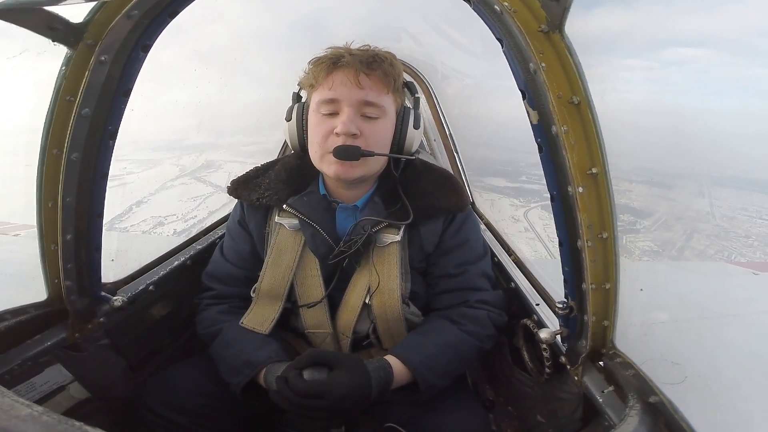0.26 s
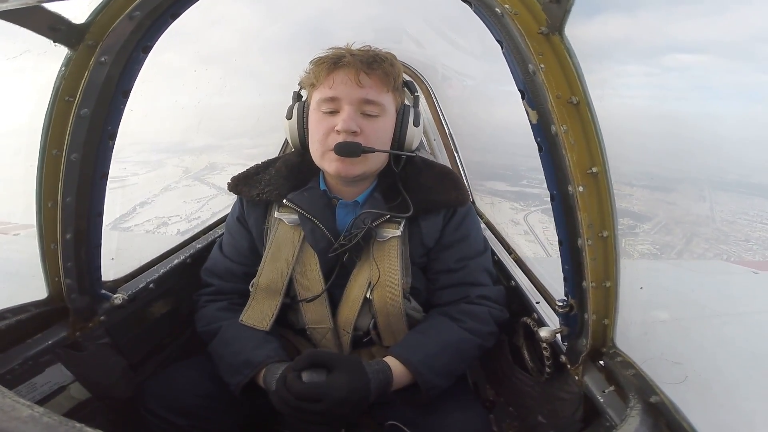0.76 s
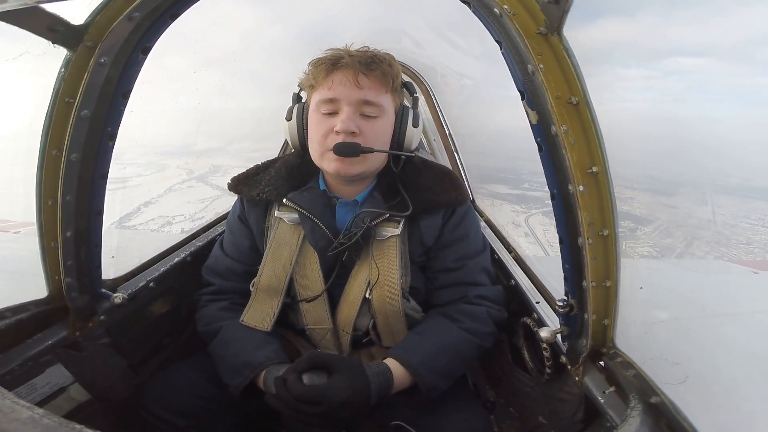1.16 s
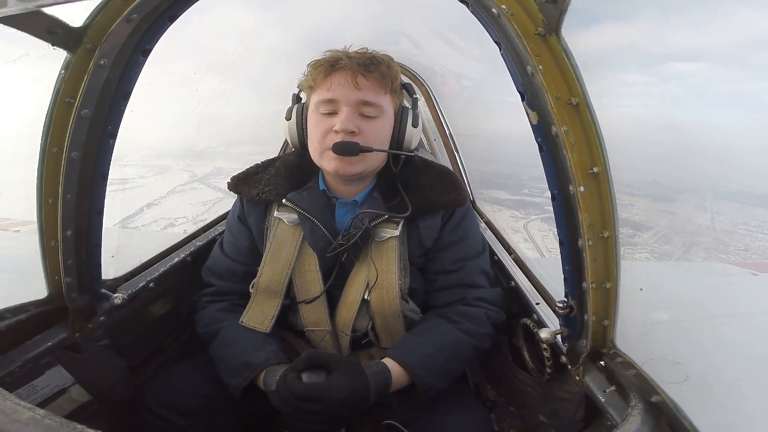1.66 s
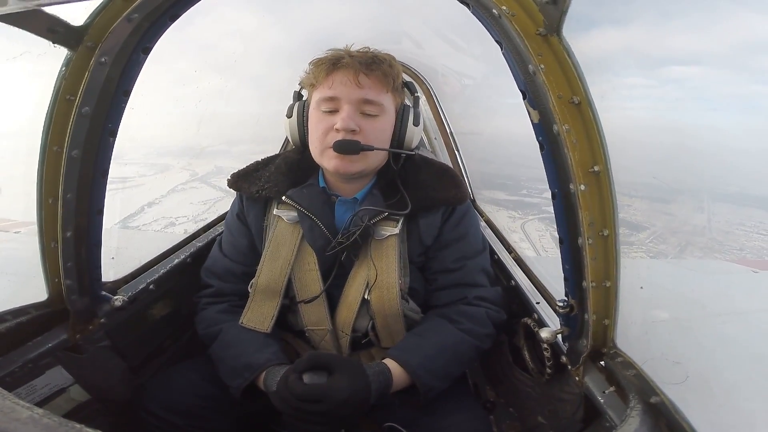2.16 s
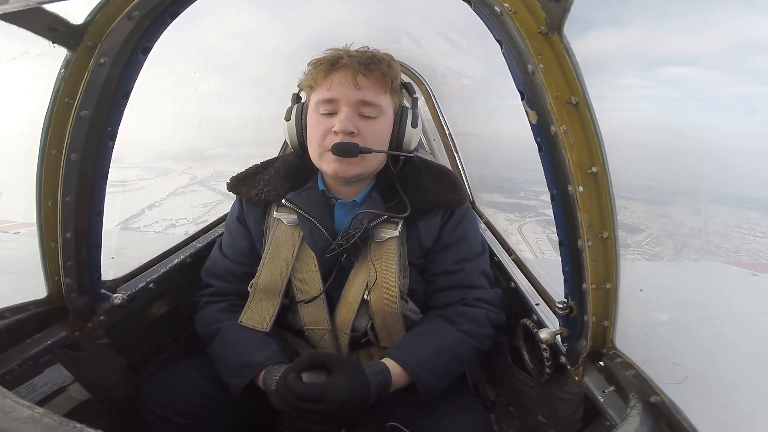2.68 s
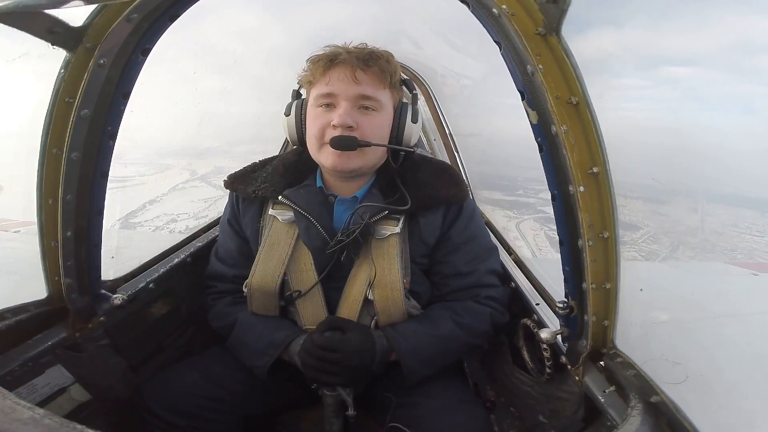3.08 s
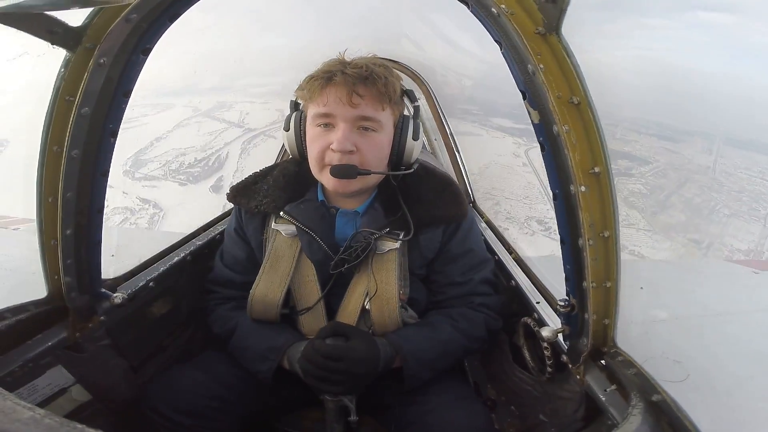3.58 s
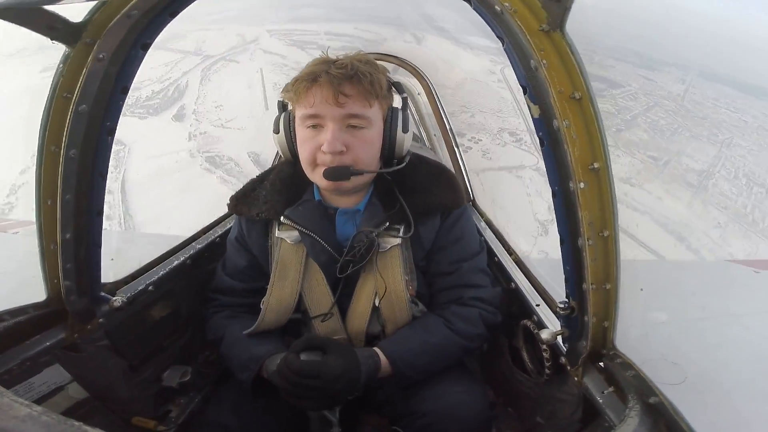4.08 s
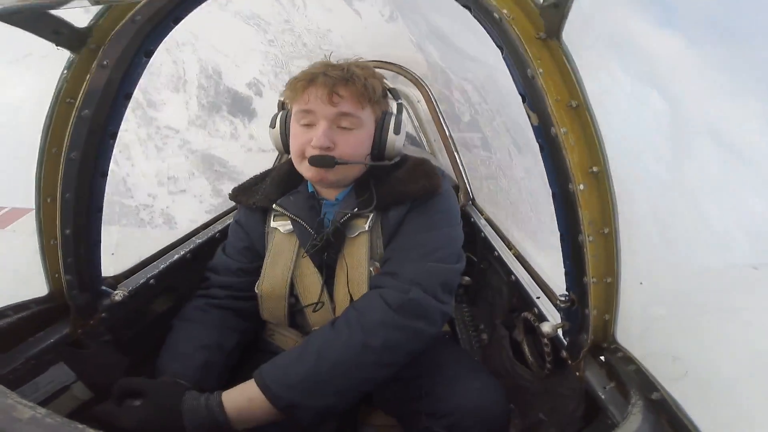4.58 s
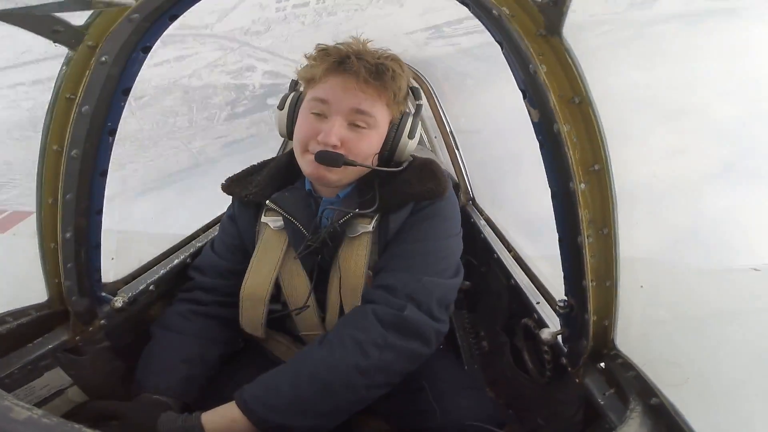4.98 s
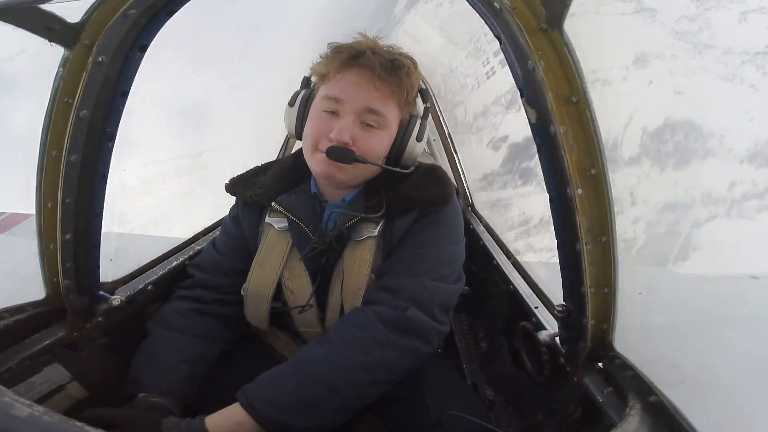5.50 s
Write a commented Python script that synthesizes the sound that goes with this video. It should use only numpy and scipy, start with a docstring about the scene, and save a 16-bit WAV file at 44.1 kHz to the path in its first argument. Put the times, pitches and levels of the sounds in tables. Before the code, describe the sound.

A close cockpit microphone with a bad plug picks up a throbbing piston engine, propeller beats and broad wind noise, heavily lopsided to the right. It runs steadily for over two seconds, drops at a click, recovers and swells with buffeting air. After four seconds loud pops, thumps and scratches chop the drone down to a faint uneven remnant, ending in rapid crackle on both channels.

```python
"""In the cockpit of a light aircraft a geared radial engine drones over propeller beat, rumble and rushing air.
Engine and propeller are sums of wavering tones; air, rumble and hiss are noise shaped in pitch and loudness.
The microphone feeds the right channel through a loose plug; the left gets a dull leak and hiss.
Plug contacts jump as voltage steps, mostly opposite in the two channels, crowd late on and at times bridge both.
Near many of these pops the level drops at once, then mostly climbs back."""
import sys
import numpy as np
from scipy import signal
from scipy.fft import rfft, irfft
from scipy.io import wavfile
from scipy.ndimage import uniform_filter1d

SR = 44100
rng = np.random.default_rng(int(sys.argv[2]) if len(sys.argv) > 2 else 0)


def generate_wav(sig):
    """Save sig (samples, or channels by samples) to the path in sys.argv[1] as 16-bit PCM at SR."""
    pcm = np.round(np.clip(np.atleast_2d(sig).T, -1, 1) * 32767).astype(np.int16)
    wavfile.write(sys.argv[1], SR, pcm)


N = 253134
TIME = np.arange(N) / SR
ROLL_S, ROLL_DB = 4.14, -4  # start of the roll; how far engine lines and treble sink in it
LOOSE_S = 4.99  # from here the plug never seats again
CYCLE_HZ, SHAFT_HZ = 20.08, 26.46  # average four-stroke cycle and geared propeller shaft
# air flow as the aircraft pulls and rolls: start_s, buffeting (0-1), hum_db (relative), rumble_db (relative)
AIR_FLOW = [(0, 0.46, 2, 1), (.25, 0.23, -7, 2), (.55, 0, 3, 5), (.75, 0.2, -1, 5), (.95, 0.02, 2, 8),
            (1.25, 0.1, -4, 3), (1.5, 0.01, 0, 6), (1.75, 0.02, -6.5, 5), (1.97, 0, 5, 5),
            (2.25, 0.11, -12, 4), (2.45, 0, -5, 6), (2.75, 0, -3, 8), (2.9, 0.14, 0, 3), (3.1, 0, -0.5, 7),
            (3.25, 0, -4, 9), (3.4, 0.45, 3.5, 5.5), (3.6, 1, 4.5, 3), (3.74, 0.9, -2.5, 3),
            (3.9, 0.86, -1.5, 6), (4.1, 1, -1, 10), (4.3, 0.56, -5, 13.5), (4.6, 0.37, 4, 16),
            (4.75, 0, -3, 14), (4.85, 0.3, -2, 22), (5.1, 0, 10, 17.5), (5.2, 0, 15, 5), (5.33, 0.3, 7, 12),
            (5.48, 0.2, 10.5, 17.5), (5.74, 0, 6, 14)]
# gritty scraping noise: pitch_hz, level_db (relative, per Hz)
SCUFF_SPECTRUM = [(1500, -9), (4000, -5), (13000, -16)]


def undb(db):
    """Turn decibels into a plain multiplier."""
    return 10 ** (np.asarray(db) / 20)


def level(x, db):
    """Scale a sound to an average (rms) level."""
    return x * undb(db) / np.sqrt(np.mean(x ** 2))


def curve(table):
    """Join the points of each table column by straight lines in time."""
    s, *columns = np.transpose(table)
    return [np.interp(TIME, s, c) for c in columns]


def walk(rate):
    """Random levels, rate new ones per second, smoothed twice; spread near 1."""
    k = int(SR / rate)
    steps = np.repeat(rng.standard_normal(N // k + 1), k)
    return 1.11 * uniform_filter1d(uniform_filter1d(steps, k), k)[:N]


def coloured(points, x=None):
    """Shape noise to a spectrum of (Hz, dB) points, silent outside them; rms 1."""
    hz, db = np.transpose(points)
    bins = np.arange(N // 2 + 1) * SR / N + 0.0011  # the offset avoids the logarithm of zero
    gain = undb(np.interp(np.log(bins), np.log(hz), db)) * (bins > hz[0]) * (bins < hz[-1])
    noise = rng.standard_normal(N) if x is None else x
    return level(irfft(rfft(noise) * gain, N), 0)


def tones(turns, orders, waver_db, rate):
    """Multiples of one rotation, each wavering in strength on its own, the low ones least."""
    total = 0
    for k, db in orders:
        strength = undb(db + waver_db * min(k / 14, 1.5) * walk(rate))
        total = total + strength * np.sin(2 * np.pi * (round(k) * turns + rng.random()))
    return total


def cabin_level():
    """The cabin level in dB: after each drop it climbs or sinks steadily, up to a ceiling."""
    start_db, fall_ms = -16, 6.4  # opening level; how long a drop takes
    # sudden changes of level: start_s, level_db (just after the drop), climb_db_per_s (negative sinks)
    level_drops = [(2.594, -32, 14.6), (3.92, -14, -27), (4.133, -28, -60), (4.19, -31.5, 63),
                   (4.27, -28.5, -60), (4.305, -32, -250), (4.335, -39, 140), (4.41, -44, 77),
                   (4.559, -43.5, 103), (4.727, -38.5, 52), (4.783, -63, 168), (4.86, -49.5, 60),
                   (5.008, -47.5, 218), (5.07, -45, -70), (5.13, -47.5, 140), (5.248, -55, 160),
                   (5.29, -48.5, 44), (5.565, -45.5, 98), (5.671, -47.5, 160)]
    s, low_db, climb = np.transpose([(0, start_db, 0.043)] + level_drops)
    k = np.searchsorted(s, TIME, "right") - 1
    db = np.minimum(low_db[k] + climb[k] * (TIME - s[k]), start_db + 2.0)
    size = int(fall_ms * SR / 1000)
    return uniform_filter1d(db, size=size, origin=(size - 1) // 2)


def buffeted(calm_db, added_db):
    """A level in dB that moves from its calm value by added_db at full buffeting."""
    return calm_db + added_db * curve(AIR_FLOW)[0]


def roll_change():
    """The level change in dB once the aircraft rolls."""
    return ROLL_DB * (TIME > ROLL_S)


def input_floor():
    """The two inputs' own steady noise, left and right."""
    # input noise: pitch_hz, level_db (relative, per Hz)
    floor_spectrum = [(300, 0), (5000, 0), (9000, -4), (14000, -10)]
    return [undb(db) * coloured(floor_spectrum) for db in (-82, -90)]


def left_hiss(cabin_db):
    """Hiss on the left that follows the cabin level and sinks in the roll."""
    # hiss: pitch_hz, level_db (relative, per Hz)
    hiss_spectrum = [(200, 4), (500, -13), (1000, -11), (2000, -14), (4000, -18), (6500, -20), (8500, -20),
                     (10500, -20.5), (12500, -18)]
    return undb(cabin_db - 42.0 - 3.0 * (TIME > ROLL_S)) * coloured(hiss_spectrum)


def rattle():
    """Loose fittings tick finely and unevenly once the aircraft rolls: random hits with short noise tails."""
    # ticking fittings: pitch_hz, level_db (relative, per Hz)
    rattle_spectrum = [(3500, -10), (6000, 3), (8500, -6), (12000, -14)]
    ticks_per_s, fade_ms = 250, 0.8
    hits = (rng.random(N) < ticks_per_s / SR) * undb(5.0 * rng.standard_normal(N))
    smear = signal.lfilter([1], [1, -np.exp(-1000 / (fade_ms * SR))], hits)
    ticks = coloured(rattle_spectrum, smear * rng.standard_normal(N))
    return undb(-40.5) * (TIME > ROLL_S) * ticks


def fizz():
    """Faint high noise that weakens with buffeting and in the roll."""
    # high fizz: pitch_hz, level_db (relative, per Hz)
    fizz_spectrum = [(5500, -6.5), (8000, 2), (10000, -5.5), (12000, 2), (14000, 5)]
    return undb(buffeted(-39, -1.5) + roll_change()) * coloured(fizz_spectrum)


def rumble():
    """Deep, unevenly swelling noise that follows the air flow."""
    # deep rumble: pitch_hz, level_db (relative, per Hz)
    rumble_spectrum = [(20, 8.5), (35, 6.5), (65, -3.5), (105, 1.5), (125, -0.5), (145, -2.5), (180, -14)]
    rumble_db = curve(AIR_FLOW)[2]
    return undb(rumble_db - 8.5 + 2 * walk(12.)) * coloured(rumble_spectrum)


def rushing_air(cycle):
    """Broad noise pulsed by the exhaust; its treble sinks in the roll."""
    # rushing air: pitch_hz, level_db (relative, per Hz)
    rush_spectrum = [(150, -7.5), (220, -7), (300, -2.5), (430, -4), (550, -3), (790, -2.5), (1000, -6.5),
                     (1500, -10), (2000, -17), (2600, -28), (3300, -32.5), (4500, -42), (6000, -43),
                     (7000, -85)]
    # uneven cylinders: the exhaust puffs throb at the firing rate and at thirds of it
    throb = 1 + sum(depth * np.cos(2 * np.pi * k * cycle) for k, depth in ((9, .045), (3, .13), (6, .071)))
    rush = coloured(rush_spectrum, throb * undb(walk(40.)) * rng.standard_normal(N))
    treble = signal.sosfiltfilt(signal.butter(2, 2600, "high", fs=SR, output="sos"), rush)
    return undb(buffeted(0.9, -3) - 2.0) * (rush + (undb(roll_change()) - 1) * treble)


def draught():
    """Air through the canopy gaps: noise that grows with buffeting."""
    # air through gaps: pitch_hz, level_db (relative, per Hz)
    draught_spectrum = [(700, -3), (1300, -1.5), (2100, -18.5)]
    return undb(buffeted(-15.5, 9.5)) * coloured(draught_spectrum)


def boom():
    """The cabin air resonates as narrow low noise, with uneven surges in the roll."""
    # cabin air resonance: pitch_hz, level_db (relative, per Hz)
    boom_spectrum = [(97, -21), (104, -1.5), (112, 0), (133, -2.5), (140, -20)]
    hum_db = curve(AIR_FLOW)[1]
    surge_db = -.5 * roll_change() * walk(19.0)
    return undb(hum_db - 8.5 + surge_db) * coloured(boom_spectrum)


def thrum(cycle, shaft):
    """Before the roll the third shaft multiple, then the eleventh engine multiple, swell."""
    # swelling tones: start_s, level_db (before wavering, relative to the cabin)
    swells = [(3.18, 0), (3.68, -7)]
    rise_s, total = .2, 0
    for turns, (s, db) in zip((3 * shaft, 11 * cycle), swells):
        swell = undb(db + 1.5 * walk(10.)) * np.clip((TIME - s) / rise_s, 0, 1)
        total = total + swell * np.sin(2 * np.pi * turns)
    return total * (TIME < ROLL_S)


def propeller(shaft):
    """The propeller beats at multiples of its shaft; the higher ones follow the hum of the air flow."""
    # propeller tones: shaft_multiple, level_db (relative)
    shaft_tones = [(2, -2.5), (3, -12), (4, -3), (6, -17), (8, -22), (12, -18)]
    hum_db = curve(AIR_FLOW)[1]
    beat = level(tones(shaft, shaft_tones[:1], waver_db=5., rate=6.), -5.0)
    higher = level(tones(shaft, shaft_tones[1:], waver_db=5., rate=6.), -3.5)
    return undb(hum_db + 2 * roll_change()) * higher + undb(roll_change()) * beat


def valve_ticks(cycle):
    """One loud valve ticks once a crank turn, harder on some turns: noise that fades within each turn."""
    # valve gear: pitch_hz, level_db (relative, per Hz)
    tick_spectrum = [(2200, -24), (3500, 9.5), (5500, -2), (6300, -9), (8500, -7)]
    turn = 2 * cycle + .36  # two crank turns in a four-stroke cycle
    blow = undb(2.7 * rng.standard_normal(N // 500))[turn.astype(int)]
    return coloured(tick_spectrum, blow * np.exp(-(turn % 1) / 0.28) * rng.standard_normal(N))


def engine(cycle):
    """The geared radial engine: multiples of its cycle, a gear tooth tone and valve ticks."""
    # engine tones through airframe and cabin: cycle_multiple, level_db (relative)
    cycle_tones = [(3, -18.7), (4, -13.0), (5, -18.6), (6, -8.9), (7, 0.0), (8, -14.3), (9, -12.1),
                   (10, -20.7), (11, -21.1), (12, -18.0), (13, -22.7), (14, -9.7), (15, -15.3), (16, -10.5),
                   (17, -17.9), (18, -15.7), (19, -21.4), (20, -12.5), (22, -15.2), (23, -21.0),
                   (24, -16.4), (25, -4.8), (26, -21.2), (27, -20.8), (28, -18.7), (29, -15.1), (31, -10.2),
                   (33, -14.0), (35, -23.8), (36, -21.3), (37, -22.8), (38, -14.9), (39, -17.1),
                   (40, -18.6), (41, -19.8), (44, -23.4), (45, -22.3), (56, -22.8)]
    gear_tone = (96, -27)  # tooth mesh: cycle multiple, dB
    drone = tones(cycle, cycle_tones + [gear_tone], waver_db=2., rate=18.)
    motor = level(drone, -0.73) + undb(-36) * valve_ticks(cycle)
    return undb(buffeted(4, -6) + roll_change()) * motor


def cabin(cabin_db):
    """All cabin sounds together, engine and propeller geared to one slightly unsteady rotation."""
    cycle = np.cumsum(1 + .0004 * walk(2.)) * CYCLE_HZ / SR  # cycles completed so far
    shaft = cycle * SHAFT_HZ / CYCLE_HZ
    air = rushing_air(cycle) + draught() + boom() + rumble() + fizz()
    machine = engine(cycle) + propeller(shaft) + thrum(cycle, shaft)
    return undb(cabin_db) * (air + machine + rattle())


def scratches():
    """Faint scratches on the microphone in the roll: short bursts of grit."""
    # scratches: peak_s, level_db (at the peak)
    scratch_times = [(4.1894, -60), (4.2714, -56), (4.3044, -59), (4.3194, -60), (4.3874, -53),
                     (4.3974, -45), (4.4074, -54), (4.5231, -58), (4.5394, -56), (4.6074, -57.5),
                     (4.7656, -53.5), (4.8294, -72), (4.9194, -65)]
    fade_ms = 1.0
    bursts = sum(undb(db) * np.exp(-np.abs(TIME - s) * 1000 / fade_ms) for s, db in scratch_times)
    return coloured(SCUFF_SPECTRUM) * bursts


def knock():
    """The capsule is knocked and rings for one short swing: up, hard down, up."""
    t = TIME - 4.7352
    width_ms, ring_hz = .22, 2200
    ring = np.cos(2 * np.pi * ring_hz * t - np.pi / 4)
    return -.3 * np.exp(-(t * 1000 / width_ms) ** 2 / 2) * ring


def bumps():
    """Dull bumps on the microphone: a cusp swings back and settles slowly, and scuffs while the plug sits."""
    # bumps: peak_s, pressure (share of full scale), sharpness_ms
    bump_times = [(4.316, 0.11, 2.2), (4.394, -0.29, 5.3), (4.557, 0.19, 1.6), (4.594, -0.29, 2),
                  (4.783, 0.26, 2.8), (5.174, -0.33, 5.6), (5.188, 0.12, 3.5), (5.204, 0.2, 2.6),
                  (5.219, 0.0087, 2.7), (5.234, -0.072, 2.1), (5.549, 0.019, 1.1), (5.732, -0.12, 5.6)]
    swing, settle_ms, scuff_db = 1.37, 16.3, -30.0
    out, grit = 0, coloured(SCUFF_SPECTRUM)
    for s, size, ms in bump_times:
        before, after = np.minimum(TIME - s, 0) * 1000, np.maximum(TIME - s, 0) * 1000  # ms
        swing_back = (1 + swing) * np.exp(-after / ms) - swing * np.exp(-after / settle_ms)
        cusp = np.exp(before / ms) * swing_back
        scuff = undb(scuff_db) * grit * np.exp(before - after) * (s < LOOSE_S)
        out = out + size * (cusp + scuff)
    return out


def smooth_steps(steps, ms):
    """Spread sudden steps into gradual ones that close in on their goal."""
    keep = np.exp(-1000 / (ms * SR))
    return signal.lfilter([1 - keep], [1, -keep], steps)


def plug():
    """Bias voltage steps through the coupling capacitors; the metal chatters around each step."""
    # contact jumps: start_s, hold_ms, left_jump, right_jump (steps before the capacitors, 1 = full scale),
    # return_share (of the jump; negative jumps on), chatter_db (relative)
    contact_jumps = [(2.6124, .09, -1.04, 1.04, 1, -10), (2.859, .09, -0.25, 0.16, 1, 2),
                     (4.1278, .07, -0.041, 0.042, 2, 0), (4.133, 0.2, -1.13, 1.1, 0.9, 4),
                     (4.17043, 0.14, -1.6, 0.92, 0.84, -3), (4.17062, .07, 0.014, -0.59, 0.66, -4),
                     (4.4304, 3.24, -1.26, 0.22, 0.16, 3), (4.4308, 1, 0.25, -0.082, 0.11, -2),
                     (4.7351, .05, -1.27, 1.6, 1, -9.5), (4.981, 0.49, -0.67, .24, 1.13, 1),
                     (4.996, 3.3, -0.5, 0.28, 0.7, -8), (5.012, 2.6, -0.013, 0.09, 1.2, -10),
                     (5.0158, 2.8, -0.16, 0.23, .9, -5), (5.0233, 6.5, -.16, .19, 1.1, 3),
                     (5.0327, 3.7, -.15, 0.17, 1.2, 1), (5.0679, 0.84, -1.02, 0.86, 0.4, -4),
                     (5.07, 0.15, 0.46, -0.37, 1, -1), (5.08, 5.9, 0.44, -0.53, 0.8, 3),
                     (5.0992, 3.9, 0.26, -0.31, 1, 11.5), (5.093, .6, .05, -.05, 0, 6),
                     (5.1211, 0.092, .09, -0.2, 0.4, -1), (5.1369, 3.4, 0.22, -0.26, 1.1, -1),
                     (5.142, 0.45, -.07, .09, 1, 3), (5.168, 1, -.02, .03, 1, 4),
                     (5.1738, .25, .06, -.07, 1, 1), (5.181, .2, .02, -.02, 1.5, 7),
                     (5.2061, 1, 0.076, -0.089, 0, 2), (5.2112, 0.58, -0.06, 0.06, 3.5, 1),
                     (5.219, .8, -.06, .06, -2, -3), (5.243, 1, 0.027, -.05, 0.18, 3),
                     (5.2484, 1, 1.5, -1.5, -0.2, 1), (5.2533, 1, -.2, .22, 0.5, -3),
                     (5.2715, 1.1, .13, -.16, 1, -5), (5.2808, .3, .02, -.02, 1.5, 1),
                     (5.286, .2, .03, -.03, 1, 7), (5.3178, 1.4, .04, -.04, 1, 2),
                     (5.3236, 5.1, .06, -.06, 1.9, -3), (5.3312, 0.75, .08, -.09, 1.5, -10),
                     (5.3394, 1, .09, -.09, 0, -14), (5.3571, .4, -.06, .06, 1.5, 1),
                      (5.3608, 6.1, 0.52, -0.6, 0.8, -8), (5.394, .1, -.05, .05, 0.5, -2),
                     (5.3985, 1, .04, -.04, -0.5, 9), (5.3998, 1.2, .11, -.11, 1.2, 3),
                     (5.4194, 8.9, 0.24, -0.27, 0.5, -1), (5.43, 1, -.04, .04, 0.15, 3),
                     (5.4335, 1, .04, -.04, 0, -6), (5.475, 6.2, .52, -.45, 0.2, -2),
                     (5.4833, 1.2, -.15, .17, -0.5, -10), (5.4915, 0.37, .1, -.13, 1, -1),
                     (5.4945, 6.2, 0.31, -0.33, 1.2, -7), (5.5358, 0.76, 0.079, -.05, 0.55, 0),
                     (5.545, 1, -0.098, 0.21, 0.3, 2), (5.5496, 6.2, 0.95, -0.74, 0.45, -3),
                     (5.5612, 3.5, .34, -.45, 0.9, -12), (5.568, 1, 0.2, -0.16, -0.5, -9),
                     (5.5806, 6, -0.27, 0.35, 1.5, -1), (5.613, 3.5, -0.43, .45, 1.3, -2),
                     (5.6139, .6, -.07, .07, .8, -6), (5.6155, 1, -0.35, .33, 0, 4),
                     (5.615, 0.27, .27, -.28, 1.5, 0), (5.6203, 1, .06, -.06, -3, -6),
                     (5.6267, 0.13, .4, -.42, 0.81, 2), (5.627, 1.8, 0.37, -.4, 1.2, -6),
                     (5.647, 1, 0.18, -0.28, 0.19, -5), (5.648, 4.5, 0.4, -0.36, 1.9, -2),
                     (5.656, 1.9, -.11, .11, -1, -8), (5.6627, 3.55, 0.52, -0.6, 1, 9),
                     (5.6673, 5.9, 0.536, -0.65, 1, -8), (5.6785, 1, .085, -.085, -1, -9),
                     (5.684, 1, -.03, .03, -5, -3), (5.6911, 5.8, -.045, .045, 1.5, -11),
                     (5.7042, 1.2, -.055, .055, 4.5, -16), (5.71, 1.6, -.06, .06, -2, -14),
                     (5.718, 1, .085, -.085, -1, -16), (5.7223, 1, 0.09, -0.1, 0, -10),
                     (5.723, 3.2, 0.37, -.36, 1.2, -17), (5.7243, 0.18, -.38, .39, 1.5, -13),
                     (5.7255, .09, -.19, .19, 2, -10), (5.7306, .3, .05, -.05, 2, -4)]
    # haze around the jumps: pitch_hz, level_db (relative, per Hz)
    haze_spectrum = [(1200, -3), (3000, 0), (5000, -6), (9000, -16)]
    creep_ms, sag_ms = 0.11, .3
    stray_db, stray_rate = -49.0, 400.0  # tiny slips; rate per s before crowding scales it
    sharp, slow, sag, shaken = np.zeros((4, 2, N + SR))
    for s, ms, left, right, share, db in contact_jumps:
        # the jump itself, then its return after the hold
        for lag, sense in (0, 1), (int(ms / 1000 * SR + .5), -share):
            at = int(s * SR) + lag
            # small moves and downward moves of a held contact creep, the rest snap
            held_down = ms > 1 and -.33 < sense * left < 0
            creeps = held_down or (s > LOOSE_S and abs(sense * left) < .1)
            # a held contact lets go slowly
            sags = lag > 0 and ms > 3 and sense * left < 0 and s > LOOSE_S
            steps = sag if sags else slow if creeps else sharp
            steps[:, at] += sense * left, sense * right
            shaken[:, at] += np.abs([left, right]) * abs(sense) * undb(db)
    opposite = np.array([[1], [-1]])

    # many tiny slips while the plug hangs loose, crowding around the big ones
    busy = uniform_filter1d(np.abs(sharp[0] + slow[0])[:N], size=900) * 900
    slips_now = rng.random(N) < (.3 + np.minimum(busy, 1)) * stray_rate / SR
    stray = undb(stray_db) * slips_now * (TIME > LOOSE_S) * rng.laplace(size=N)
    slow[:, :N] += stray * opposite
    edges = (sharp + smooth_steps(slow, creep_ms) + smooth_steps(sag, sag_ms))[:, :N]

    # each step shakes the metal: a burst in a faint, longer grit
    away_ms = np.abs(np.arange(-600, 601)) * 1000 / SR
    burst = np.exp(-away_ms / 0.45) + undb(-20.0) * np.exp(-away_ms / 1.6)
    shake = signal.fftconvolve(shaken[:, :N] + np.abs(stray), burst[None], "same", axes=1)
    # sparse bounces, mostly opposite in the two channels like the steps
    bounce = rng.standard_normal(N) * opposite + 0.25 * rng.standard_normal(N)
    bounce = bounce * (rng.random(N) < .3)
    dull, bright = (signal.lfilter(*signal.butter(1, hz, fs=SR), shake * bounce) for hz in (3500., 7500.))
    shine = np.clip(.5 + .5 * walk(140.0), 0, 1)  # some bounces scrape, some ping
    chatter = shine * bright + (1 - shine) * 1.3 * dull

    # a faint dull haze lingers around clusters of slips
    crowd = uniform_filter1d(uniform_filter1d(np.minimum(shaken[0, :N], .1), size=700), size=700) * 700
    haze = undb(-40 + 4.0 * walk(150.)) * crowd * (TIME > LOOSE_S) * coloured(haze_spectrum) * opposite
    volts = np.cumsum(edges, axis=1) + haze + undb(-18.0) * np.tanh(chatter / 0.46)
    for hz in (70, 20):  # the coupling capacitors let each step drain away
        volts = signal.lfilter(*signal.butter(1, hz, "high", fs=SR), volts)
    return volts


def left_leak(mic):
    """The left hears the microphone dulled, plus a faint clear part, louder with buffeting."""
    dull = signal.lfilter(*signal.butter(1, 45., fs=SR), mic)
    return undb(buffeted(-27.5, 6)) * (dull + undb(-25) * mic)


def bridge():
    """How firmly the plug bridges both channels, 0 to 1, with a weak contact once it hangs loose."""
    # both channels bridged: start_s, end_s
    bridged_times = [(5.012, 5.036), (5.068, 5.137), (5.15, 5.248), (5.275, 5.36), (5.4, 5.419),
                     (5.44, 5.474), (5.503, 5.545), (5.62, 5.66), (5.7, 5.74)]
    firm = sum((TIME > a) & (TIME < b) for a, b in bridged_times)
    return uniform_filter1d(np.maximum(firm, 0.19 * (TIME > LOOSE_S)), size=40)


def scene():
    """The microphone on the right, its leak on the left, shared while the plug bridges both."""
    cabin_db = cabin_level()
    mic = cabin(cabin_db) + scratches() + knock() + bumps()
    leak = left_leak(mic)
    shared = bridge() * (mic - leak) / 2
    channels = np.array([leak + left_hiss(cabin_db) + shared, mic - shared])
    return channels + plug() + input_floor()


def record(dry):
    """The input clips just above full scale, cuts the top above 16200 Hz and clips at full scale."""
    top_cut = signal.ellip(6, .1, 50, 16200, fs=SR, output="sos")
    low = signal.sosfiltfilt(top_cut, np.clip(dry, -1.1, 1.1))
    return np.clip(low, -1, 1)


dry = scene()
out = record(dry)
generate_wav(out)
```